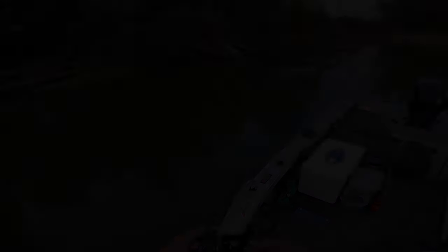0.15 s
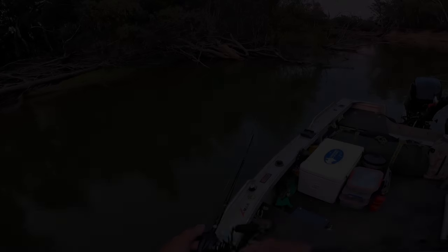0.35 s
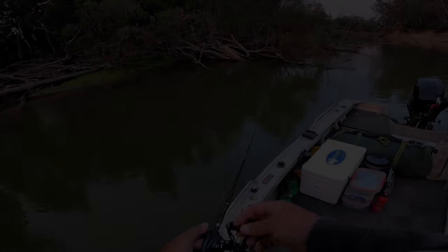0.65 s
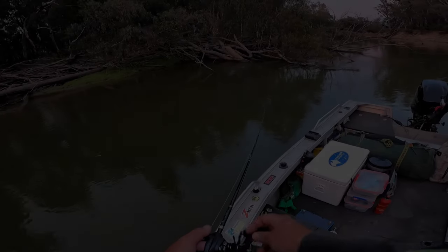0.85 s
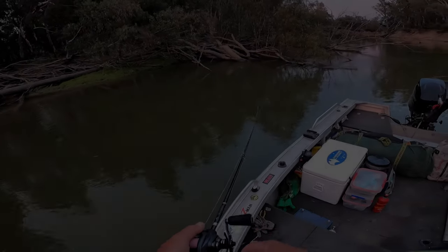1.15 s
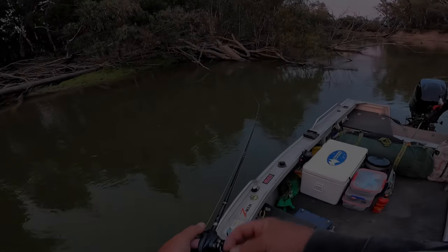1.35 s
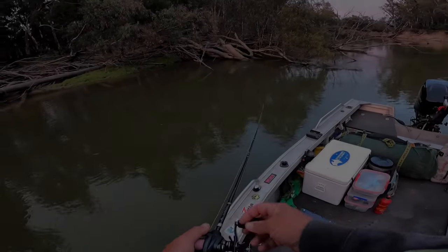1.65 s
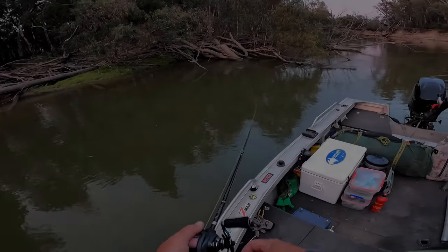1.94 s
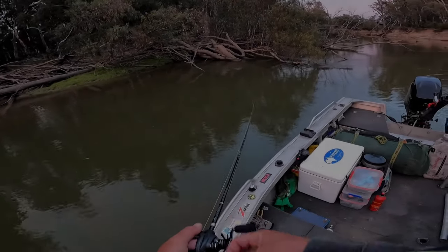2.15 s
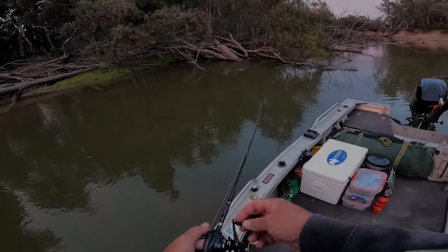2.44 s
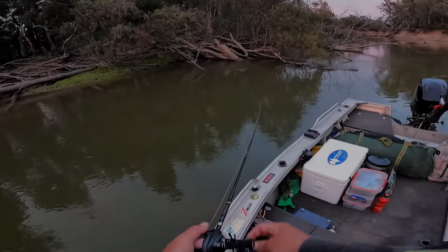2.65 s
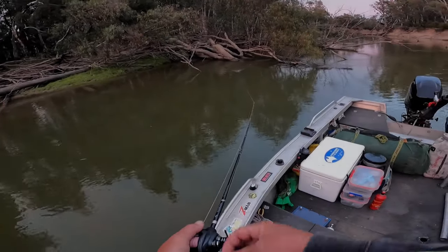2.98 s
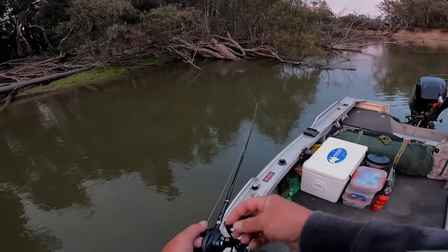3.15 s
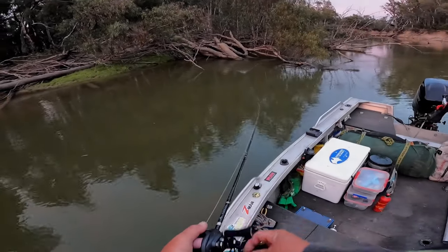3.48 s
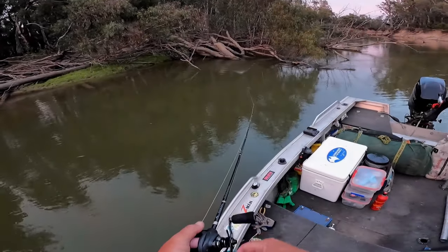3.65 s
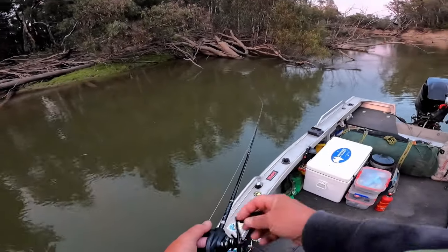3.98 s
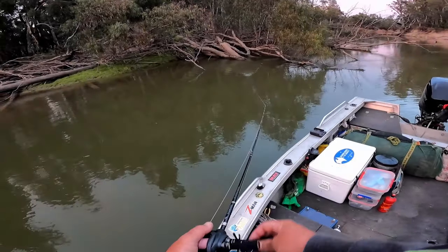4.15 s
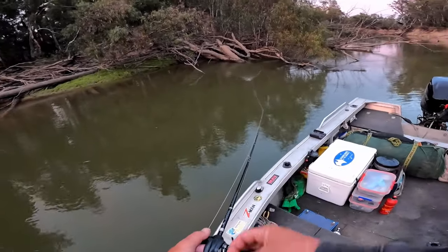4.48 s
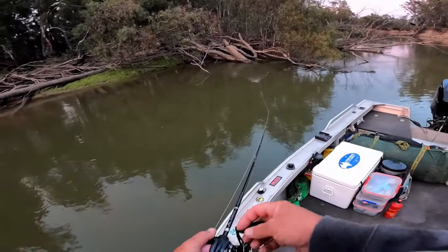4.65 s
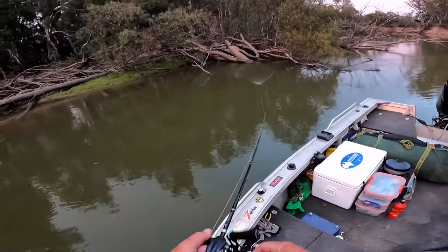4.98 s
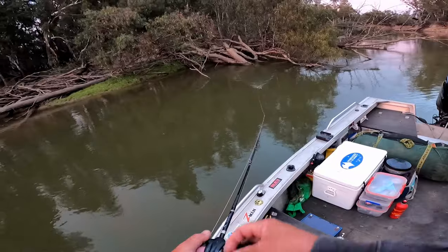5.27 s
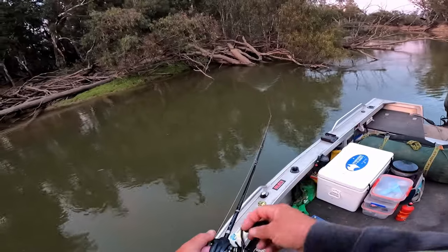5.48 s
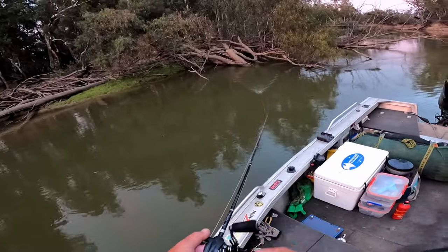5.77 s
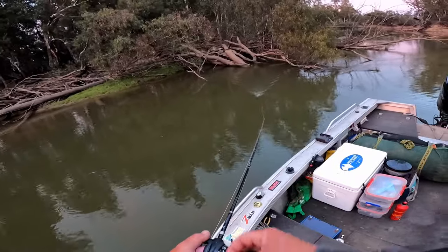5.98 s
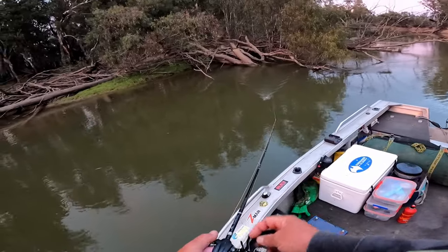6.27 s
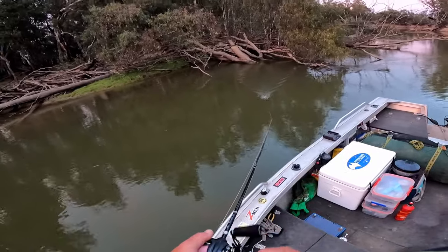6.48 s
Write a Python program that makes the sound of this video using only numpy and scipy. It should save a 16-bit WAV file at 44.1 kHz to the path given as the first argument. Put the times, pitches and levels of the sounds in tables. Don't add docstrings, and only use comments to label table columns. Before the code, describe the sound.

A wide, airy river murmur and a hazy distant flock run throughout, strongest at the start. From 0 s a harsh cockatoo screech is already under way, with nasal parrot cries; overlapping screeches swell around 0.5-1.05 s and another at 1.3-1.8 s, echoing from wooded banks. Close and dry, a fishing reel makes tiny bright ticks in uneven clusters, while water laps and softly bumps the hull. Faint dove coos and thin whistles fill gaps. A rougher, quieter screech spans 2.1-2.9 s. From 2.4 s a small bird repeats a crisp rising chip about every 0.14 s, pausing briefly near 4.6-5 s and ending around 5.5 s. At 3.6 s a sharp click coincides with short squawks; parrots cry again. At 4.4 s the hull knocks hollowly. Softer screeches and nasal calls continue, a strong reel tick lands at 5.2 s, and two-step falling notes sound right at 5.95-6.2 s before a last raspy screech.

```python
import sys
import numpy as np
from scipy import signal
from scipy.fft import rfft, irfft, next_fast_len
from scipy.io import wavfile
from scipy.ndimage import uniform_filter1d

SR = 44100
rng = np.random.default_rng(int(sys.argv[2]) if len(sys.argv) > 2 else 0)


def convert_level_to_amplitude(level_db):
    exponent = np.asarray(level_db, float) / 20
    return 10 ** exponent


def bounce(signal):
    frames = np.transpose(np.atleast_2d(signal))
    limited = np.clip(frames, -1, 1)
    pcm = np.round(limited * 32767).astype(np.int16)
    wavfile.write(sys.argv[1], SR, pcm)


N = 291942

# (f/Hz, lead/radians)
PORTS = [(300, 0.5), (900, -0.72), (2500, -1.49), (3800, -1.45), (6000, -0.17), (12000, -1)]
NOSE_LOW_HZ = 950


def evened(x):
    return x / np.sqrt(np.mean(x ** 2) + 1e-20)


def read(points, at):
    f, value = np.transpose(points)
    return np.interp(np.log(at + 1), np.log(f + 1), value)


def unroll(rows):
    s, *columns = np.transpose(rows)
    t = np.arange(s[0], s[-1], 1 / SR)
    return t, [np.interp(t, s, c) for c in columns]


def wander(count, hz):
    smoother = np.poly([np.exp(-2 * np.pi * hz / SR)] * 2)
    return evened(signal.lfilter([1], smoother, rng.standard_normal(count)))


def add(mix, s, sound, lean_db=0, side=0.54):
    length = next_fast_len(len(sound) + 64, True) // 2 * 2 + 2
    padded = np.pad(sound, (0, length - len(sound)))
    lead = side * read(PORTS, np.fft.rfftfreq(length, 1 / SR))
    left = irfft(rfft(padded) * np.exp(1j * lead))
    both = np.array([left * convert_level_to_amplitude(lean_db / 2), padded * convert_level_to_amplitude(-lean_db / 2)])
    part = mix[:, max(round(s * SR), 0):][:, :length]
    part += both[:, :part.shape[1]]


def resonate(x, hz, width):
    turn = np.exp(2j * np.pi * np.cumsum(hz * np.ones(len(x))) / SR)
    r = np.exp(-np.pi * width / SR)
    return 2 * (turn * signal.lfilter([1 - r], [1, -r], x / turn)).real


def resonate_twice(x, hz, width, width_again):
    return resonate(resonate(x, hz, width), hz, width_again)


def air():
    # (f/Hz, level per Hz/dB)
    colour = [(20, -14.5), (60, -20), (100, -75), (160, -7.5), (350, -17), (570, -6.5), (800, -11),
              (1200, 4), (3100, 1), (5000, -8), (7500, -21), (10000, -36), (13000, -43), (15500, -66)]
    # (f/Hz, likeness 0-1)
    likeness = [(60, 0.7), (150, 0.12), (400, 0.67), (1500, 1), (3000, 0.98), (7000, 0.77), (10000, 1),
                (13000, .4)]
    # (t/s, level/dB)
    chorus = [(0, 10.5), (.45, 5.5), (1.2, 2.5), (1.6, 4), (2.0, -3.5), (2.4, 2.5), (2.7, 3), (3.0, 0),
              (3.3, -3), (3.55, -1.5), (4.0, 4.5), (4.4, 0.5), (5.1, 0.5), (5.4, 3), (5.75, -4.5),
              (6.05, -1), (6.35, -5), (6.62, -4)]
    frames, hz = N // 256 + 5, np.fft.rfftfreq(1024, 1 / SR)
    a, b, c, d, patches = rng.standard_normal((frames, 513, 5)).T
    patches = evened(uniform_filter1d(uniform_filter1d(patches, 4, 0), 20, 1))
    same = np.clip(read(likeness, hz), -1, 1)[:, None]
    left = a + 1j * b
    right = same * left + np.sqrt(1 - same ** 2) * (c + 1j * d)
    z = np.array([left * np.exp(.8j * read(PORTS, hz))[:, None], right])
    flock_db = np.interp(np.arange(frames) * 256 / SR, *np.transpose(chorus))
    flock_share = np.clip((hz - 300) / 300, 0, 1)
    patchy_db = 2.6 + 1.4 * (hz < NOSE_LOW_HZ)
    z *= convert_level_to_amplitude(read(colour, hz)[:, None] + patchy_db[:, None] * patches + np.outer(flock_share, flock_db))
    return convert_level_to_amplitude(-41.5) * evened(signal.istft(z, nperseg=1024, noverlap=768)[1][:, :N])


def effort(start, top, end, hz, db, bright_db, end_db):
    mouth_hz, swell_db, slack_hz = 3277, -4.5, hz * .93
    dull_db = bright_db - 3.5
    onset = start + min(.09, .5 * (top - start))
    peak_and_end = [(top, db, hz, mouth_hz, bright_db), (end, db + end_db, hz * .97, mouth_hz, dull_db)]
    if start < 0:
        return [(0, db + swell_db, hz * 1.12, mouth_hz, bright_db), *peak_and_end]
    return [(start, db + swell_db - 10, slack_hz, mouth_hz, dull_db),
            (onset, db + swell_db, slack_hz, mouth_hz, dull_db), *peak_and_end]


def screech(rows, share, rough, growl_hz=170, growl_db=2.5):
    # (f/Hz, width/Hz, level/dB)
    beak_rings = [(977, 750, 5), (2863, 610, 18.5), (3710, 1090, 13), (4434, 1140, 7.5), (6970, 300, 3)]
    t, (effort_db, throat_hz, mouth_hz, bright_db) = unroll(rows)
    count, since = len(t), t - t[0]
    rough = np.clip(rough, 0, 1)
    unsteady = 1 + .024 * wander(count, 118.3) + .015 * wander(count, 12.07)
    turns = np.cumsum(share * throat_hz * unsteady) / SR
    folds = sum(np.cos(2 * np.pi * k * turns) for k in range(1, 13))
    puffs = (0.37 + np.exp(-(turns % 1) / 1.2)) * rng.standard_normal(count)
    drive = (1 - rough) * evened(folds) + rough * evened(puffs)
    drive = drive * convert_level_to_amplitude(2.1 * np.tanh(wander(count, 27)))
    beats = np.cumsum(growl_hz * (1 + .5 * since + .12 * wander(count, 30))) / SR
    depth_db = growl_db * (.45 + np.exp(-(since / .2) ** 2))
    drive = drive * convert_level_to_amplitude(depth_db * np.cos(2 * np.pi * beats))
    throat = resonate_twice(drive, throat_hz, 560, 560)
    for near, db in ((1, -5), (.9, -9), (1.09, -13)):
        level = convert_level_to_amplitude(db + 3 * wander(count, 8))
        ridge_hz = near * throat_hz * (1 + .025 * wander(count, 14))
        throat = throat + level * resonate(drive, ridge_hz, 90)
    mouth = resonate_twice(drive, mouth_hz, 670, 690)
    beak = sum(convert_level_to_amplitude(db) * resonate_twice(drive, f, w * 0.83, w * 0.83) for f, w, db in beak_rings)
    out = convert_level_to_amplitude(0.5) * evened(throat) + convert_level_to_amplitude(bright_db) * (evened(beak) + convert_level_to_amplitude(-3.5) * evened(mouth))
    return t[0], convert_level_to_amplitude(effort_db) * out * np.clip(np.minimum(since, t[-1] - t) / 0.0033, 0, 1)


def cockatoos():
    # (start t/s, loudest t/s, end t/s, throat f/Hz, roughness 0-1)
    broken = [
        (-.1, .158, .305, 1860, .54),
        (.55, .88, 1.058, 2200, .5),
        (1.27, 1.56, 1.782, 1960, .48),
        (.5, .75, 1.05, 1960, .54),
        (4.4, 4.78, 5.02, 2460, .6),
        (5.13, 5.36, 5.7, 2250, .6),
    ]
    faded = [
        (2.1, 2.45, 2.86, 2200, .77),
        (3.583, 3.6, 3.78, 1800, .68),
        (3.74, 4.0, 4.33, 2180, .42),
        (5.8, 5.89, 6.02, 2500, .82),
        (6.07, 6.38, 6.56, 1900, .9),
    ]
    # (effort level/dB, brightness level/dB, left minus right level/dB, side 0-2)
    efforts = [(-29.5, -4, -3, .94), (-28.5, -3, -1, 0.68), (-33.5, -4.5, -0.5, 0.78), (-31, -2, 0.5, 0.8),
               (-39.5, -10.5, -3, 0.57), (-43.5, 0, -4, 1.1), (-48, -6.5, 12.5, 1.4), (-40.5, -43, -1, .6),
               (-38, -6, -3, 0.63), (-46, 3.5, -3, 0.62), (-42, -2, 0.5, 0.56)]
    # (rasp pitch as a share of throat f, throb f/Hz, throb depth level/dB)
    growls = [(.5, 125, 3), (.5, 125, 2), (.5, 108, 6), (.5, 180, 3), (.5, 150, 2), (.86, 150, 2),
              (.36, 150, 2), (.28, 130, 3), (.28, 150, 2), (.89, 150, 3), (.24, 150, 2)]
    out = np.zeros((2, N))
    ends_db = [0] * len(broken) + [-7.5] * len(faded)
    for row, end_db, loudness, growl in zip(broken + faded, ends_db, efforts, growls):
        *moments, rough = row
        db, bright_db, lean_db, side = loudness
        share, *throb = growl
        curve = effort(*moments, db, bright_db, end_db)
        add(out, *screech(curve, share, rough, *throb), lean_db, side)
    return out


def glide(start, length, first_hz, last_hz, db, first_db, last_db, arch=0):
    middle_hz = .5 * (first_hz + last_hz) * (1 + arch)
    return [(start, first_hz, db + first_db), (start + .5 * length, middle_hz, db),
            (start + length, last_hz, db + last_db)]


def partials(rows, fall_db, odd_db, nose_hz, lift_db, sheen_hz, sheen_db):
    k = np.arange(2, 15)
    hz = k * np.mean([row[1] for row in rows])
    nose = lift_db * np.exp(-((hz - nose_hz) / 400) ** 2)
    sheen = sheen_db * np.exp(-((hz - sheen_hz) / 840) ** 2)
    fall = fall_db * (np.minimum(k, 7) - 2) - 4 * np.maximum(k - 6, 0)
    odd = odd_db * np.where(k < 7, k % 2, 1)
    return [-22, *(-3 + fall + odd + nose + sheen - 14 * (hz < NOSE_LOW_HZ))]


def voice(rows, levels_db):
    t, (hz, effort_db) = unroll(rows)
    turns = np.cumsum(hz * (1 + .004 * wander(len(t), 78))) / SR
    out = 0
    for k, db in enumerate(levels_db):
        flutter_db = 1.8 * (1 + (k > 4)) * wander(len(t), 22)
        out = out + convert_level_to_amplitude(db + flutter_db) * np.cos(2 * np.pi * ((k + 1) * turns + rng.random()))
    return t[0], np.sqrt(2) * convert_level_to_amplitude(effort_db) * out * signal.windows.tukey(len(t), .1)


def parrots():
    # (t/s, f/Hz, level/dB)
    long_cries = [
        [(0.0, 581, -32), (0.056, 605, -41), (0.43, 579.5, -43), (0.46, 575, -46), (0.56, 560.4, -40)],
        [(3.42, 642, -70), (3.47, 656, -47.5), (3.52, 676, -49), (3.565, 762, -48)],
        [(3.68, 574, -36.5), (3.74, 589.6, -36), (3.785, 602, -59)],
        [(4.87, 652.6, -47), (4.915, 647.5, -38.5), (4.96, 599, -44), (5.03, 584, -85)],
        [(5.37, 589.5, -44.5), (5.42, 579, -53), (5.52, 576, -45.5), (5.58, 544, -50)],
        [(5.625, 642, -40.5), (5.655, 635, -48), (5.69, 657, -43.5), (5.73, 636.3, -45), (5.815, 639.6, -43),
         (5.86, 611.5, -45.5), (5.9, 583, -55), (5.95, 582, -42.5)],
        [(6.18, 358, -50), (6.25, 360.3, -51), (6.3, 377.5, -49.5), (6.34, 396.3, -50.5), (6.365, 420, -43),
         (6.43, 422, -50), (6.47, 394, -45)],
        [(3.75, 625, -52), (3.82, 627, -58), (3.9, 622, -44.5), (3.945, 626, -45), (3.97, 612, -46)],
        [(4.02, 607, -45), (4.1, 581, -39.5), (4.2, 578, -41.5), (4.265, 571, -43)],
        [(5.18, 551, -47.5), (5.25, 552, -44), (5.33, 526, -44)],
        [(5.16, 672, -48), (5.19, 673, -39.5), (5.22, 675, -48)],
        [(2.795, 566.4, -38), (2.825, 606, -45.5), (2.9, 599.7, -43.5), (2.97, 611.6, -43.5),
         (3.025, 583.5, -42.5)],
    ]
    # (start t/s, length t/s, first f/Hz, last f/Hz)
    swelling = [
        (.36, .2, 665, 612),
        (2.43, .27, 578, 570),
        (4.5, .36, 602, 600),
        (5.54, .075, 635, 658),
        (2.3, .14, 604, 615),
    ]
    steady = [
        (1.94, .24, 600, 622),
        (3.955, .085, 680, 656),
        (1.068, .075, 420, 396),
    ]
    short_db = [-45.5, -50.5, -52, -52.5, -61, -51, -37.5, -45]
    # (fall per overtone level/dB, odd overtones level/dB, nose f/Hz, its lift level/dB, left minus right level/dB)
    noses = [(-3, -10, 2350, 5, 0), (-2.5, -9, 2750, 8, 15.5), (-5, 3, 2300, -6, -0.5),
             (-0.5, -2.5, 2370, 11.5, 1), (-5, 3, 1750, 7, -0.5), (-2.5, 0.5, 2600, 17, -0.5),
             (-1, -1, 1830, 14, 2.5), (-.8, 1, 3700, 0, -.5), (-2.5, -3, 2300, -6, -.5),
             (-2.5, -5, 2200, 3, 0), (-2.5, -6, 2700, 4, 0), (-6, 0, 1810, 13, -1.5),
             (-1, 0, 2560, 11, -1.5), (-8, -7, 2020, 27, 4), (-0.5, -1.5, 2630, 12.5, 7),
             (-3.5, 4, 2580, 20, 0.5), (-2, 0, 2400, 4, 36), (-7, -16, 1220, 0, 15),
             (-6.5, -26, 2700, 14.5, 3), (0, 1, 1950, 17, 4.5)]
    sheens = {5.37: (5200, 32), 3.75: (6100, 15), 4.02: (3600, 3), 5.625: (3500, 5), 6.18: (3500, 13)}
    out = np.zeros((2, N))
    cries = long_cries + [glide(*row, db, -1, 5.7, arch=.018) for row, db in zip(swelling, short_db)]
    cries += [glide(*row, db, 0, -2) for row, db in zip(steady, short_db[len(swelling):])]
    for rows, (*nose, lean_db) in zip(cries, noses):
        sheen = sheens.get(rows[0][0], (3500, 0))
        add(out, *voice(rows, partials(rows, *nose, *sheen)), lean_db, side=0.71)
    return out


def banks(x):
    # (f/Hz, t/s)
    dying = [(300, 2.8), (2000, 0.71), (6000, 1.12), (12000, 0.19)]
    taps = np.zeros((2, SR))
    at = np.arange(900, SR - 20, 20) + rng.integers(0, 20, (2, (SR - 901) // 20))
    np.put_along_axis(taps, at, rng.choice([-1., 1.], at.shape), 1)
    taps[1] = 0.63 * taps[0] + 0.47 * taps[1]
    hz, t, z = signal.stft(taps, SR, nperseg=256)
    tail = signal.istft(z * convert_level_to_amplitude(-60 * t / read(dying, hz)[:, None]), SR, nperseg=256)[1]
    return signal.fftconvolve(x, tail / np.linalg.norm(tail[0]), axes=1)[:, :N]


def ring(db, hz, t60, noisy=0.45, spread=1.0):
    t = np.arange(0, 1.5 * t60 + .01, 1 / SR)
    blur = evened(resonate_twice(rng.standard_normal(len(t)), hz, spread * hz, spread * hz))
    tone = (1 - noisy) * np.sin(2 * np.pi * hz * t) + noisy * blur
    return convert_level_to_amplitude(db - 60 * t / t60) * tone * np.minimum(t * hz * 2, 1)


def hull():
    # (t/s, level/dB, f/Hz)
    laps = [(0.035, -74, 291), (0.398, -62, 188), (1.392, -63, 193), (1.787, -69, 221), (1.978, -60, 170),
            (2.142, -56.5, 216), (2.918, -64, 153), (3.21, -55, 178.2), (3.473, -60, 176),
            (4.062, -56, 171), (4.383, -48, 255), (4.87, -57, 160), (5.81, -61, 160.6), (6.497, -56, 170)]
    bumps = [(0.257, -70, 53.8), (0.55, -69, 32.3), (1.115, -64, 51.1), (2.254, -64, 29.6),
             (2.839, -61, 24.2), (3.127, -62, 37.4), (3.481, -71, 34.6), (3.732, -75, 24.2),
             (4.365, -60, 59.2), (4.583, -64, 50.3), (4.85, -75, 53.8), (5.457, -56, 34),
             (5.728, -70, 24.2), (6.327, -60, 27.2)]
    # (t/s, level/dB, f/Hz, time to die by 60 dB t/s)
    knocks = [
        (3.758, -36, 6200, .02),
        (4.372, -46, 560, .12),
        (4.385, -42, 300, .09),
        (4.402, -48, 172, .17),
        (5.0, -45, 6000, .013),
        (6.25, -48, 7100, .02),
    ]
    out = np.zeros((2, N))
    for rows, t60, lean_db in ((bumps, .25, -1.5), (laps, .12, -3)):
        for s, db, hz in rows:
            add(out, s, ring(db, hz, t60, noisy=0.16, spread=0.27), lean_db, side=0)
    for s, *blow in knocks:
        add(out, s, ring(*blow, noisy=.25, spread=.35), side=0)
    return out


def reel():
    # (t/s, low ring level/dB, low ring f/Hz, high ring level/dB)
    ticks = [(0.2344, -36, 7670, -62), (0.288, -49, 7510, -55), (1.3488, -56, 7180, -85),
             (1.3648, -55, 7470, -75), (1.3835, -38, 7170, -64), (1.4456, -51, 7200, -80),
             (1.487, -39, 7420, -73), (1.5045, -41, 7470, -71), (1.6914, -49, 7900, -70),
             (1.732, -36.5, 7400, -83), (1.854, -49, 7140, -70), (2.145, -58, 7250, -78),
             (2.1645, -59, 7300, -83), (2.1857, -43, 8150, -63), (2.364, -55, 7840, -80),
             (2.5027, -47, 7510, -65), (2.5464, -44, 7570, -59), (2.6768, -53, 7020, -75),
             (2.7706, -64, 7600, -70), (2.9493, -52, 7250, -68), (3.1502, -35, 6900, -62),
             (3.1647, -50, 7600, -62), (3.5177, -62, 7280, -65), (3.6607, -41, 7200, -50.5),
             (3.8786, -40, 7500, -64.5), (3.906, -45, 7750, -64), (4.1435, -52, 7030, -74),
             (4.159, -42, 7700, -64), (4.1834, -50, 7900, -68), (4.2476, -50, 7540, -57.5),
             (4.3257, -54, 7100, -64), (4.384, -44, 6940, -60), (4.4703, -44, 7140, -66),
             (4.5768, -41, 7200, -75), (4.7157, -50, 7050, -65), (4.884, -40, 7800, -68),
             (5.1967, -38, 6700, -69), (5.2018, -31, 7300, -59), (5.3138, -50, 7100, -68),
             (5.4142, -42, 7350, -61), (5.4435, -50, 6960, -68), (5.6456, -51, 7000, -65),
             (5.9459, -48, 7300, -66), (5.967, -42, 7560, -61), (6.051, -48, 7800, -75),
             (6.0975, -41, 7080, -58), (6.279, -44, 7590, -70), (6.37, -60, 7740, -66),
             (6.5103, -36.5, 7740, -67)]
    out = np.zeros((2, N))
    clicks = [(s, db + 7, high_db, hz) for s, db, hz, high_db in ticks]
    for k, (late, loud) in enumerate(rng.random((26, 2))):
        gear_db = -59 + 8 * loud
        clicks.append((1.9 + (k + late) / 6, gear_db + 16, gear_db - 17, 7160))
    for k, (s, low_db, high_db, hz) in enumerate(clicks):
        add(out, s, ring(low_db, hz, 0.0044, spread=0.14), lean_db=1.0, side=-0.45)
        add(out, s, ring(high_db + 10, 11440, 0.007, spread=.22), lean_db=4.0, side=-.5)
        second = ring(high_db + 14, 9960, 0.0045, noisy=0.96, spread=0.2)
        add(out, s + 0.00031, second, lean_db=6.3 * (-1) ** k, side=0)
    add(out, 3.5888, ring(-21, 2100, .006, noisy=.1), side=.3)
    return out


def whistle(rows):
    t, (hz, db) = unroll(rows)
    hz = hz * (1 + .004 * wander(len(t), 150))
    db = db + 1.5 * wander(len(t), 70)
    tone = np.sin(2 * np.pi * np.cumsum(hz) / SR)
    return t[0], np.sqrt(2) * convert_level_to_amplitude(db) * tone * signal.windows.tukey(len(t), .3)


def whistlers():
    # (start t/s, length t/s, first f/Hz, last f/Hz)
    middle = [(2.04, .022, 4780, 4740), (2.39, .06, 2550, 2250), (3.33, .07, 2470, 2720),
              (3.71, .07, 1770, 1820), (5.485, .03, 990, 990), (5.49, .045, 2450, 2180),
              (5.7, .2, 7150, 6700), (5.87, .06, 3160, 2800), (5.92, .04, 4760, 4710),
              (1.55, .23, 950, 1000), (6.18, .06, 1250, 1265), (6.18, .06, 1615, 1635),
              (.55, .17, 2800, 2880), (2.69, .06, 2350, 2250), (2.6, .2, 710, 800), (4.6, .12, 1290, 1310)]
    middle_peaks = [-50, -47, -44.5, -38.5, -48, -43, -55.5, -38.5, -44, -44.5, -47, -47, -39.5, -39.5,
                    -52.5, -44]
    high = [
        (1.94, .04, 5750, 5550),
        (2.35, .068, 6180, 6000),
        (2.425, .035, 6080, 5900),
        (2.572, .09, 6180, 6440),
        (2.708, .075, 5700, 5780),
        (2.94, .12, 5480, 5590),
        (4.085, .055, 6450, 6400),
        (2.108, .03, 6000, 6050),
    ]
    high_peaks = [-57, -43, -44, -42, -41, -39.5, -46, -58]
    out = np.zeros((2, N))
    for table, peaks, ends_db, arch in ((high, high_peaks, -12, .014), (middle, middle_peaks, -5, 0)):
        for row, db in zip(table, peaks):
            add(out, *whistle(glide(*row, db, ends_db, ends_db, arch)), lean_db=-3.0, side=0.6)
    return out


def dove():
    # (t/s, level/dB, f/Hz)
    coos = [(0.617, -50, 437), (1.029, -42, 399), (1.523, -54.5, 579), (1.971, -51.5, 516),
            (2.352, -54.5, 535), (2.677, -50, 441), (2.99, -53, 411), (3.582, -57, 469), (4.016, -71, 585),
            (4.171, -52, 486), (5.197, -52, 447), (5.869, -52, 420), (6.487, -57.5, 455.4)]
    out = np.zeros((2, N))
    for s, db, hz in coos:
        add(out, *whistle([(s, hz * 1.01, db - 6), (s + .02, hz, db - 4), (s + .045, hz * .985, db - 8)]))
    return out


def chip(s, db, hz, fresh):
    shape = [(-.02, .88, -20), (-.005, .9, -14), (0, .94, -4), (.007, .98, -2),
             (.015, 1.005, -2 - 4 * fresh), (.022 + .012 * fresh, 1.01 + .04 * fresh, -7 - 7 * fresh)]
    return whistle([(s + dt, hz * share, db + change) for dt, share, change in shape])


def chipper():
    # (t/s, f/Hz, level/dB)
    first = [(2.41, 3405, -47), (2.425, 3400, -37), (2.432, 3530, -42), (2.443, 3620, -32.5),
             (2.456, 3600, -41)]
    # (t/s, level/dB)
    chips = [(2.5534, -34.5), (2.681, -36), (2.808, -35), (2.9366, -35), (3.0741, -36.5), (3.208, -37),
             (3.3534, -33.5), (3.5066, -34.5), (3.662, -38.5), (3.813, -39.5), (3.967, -42), (4.113, -39),
             (4.2683, -39), (4.419, -39.5), (4.576, -39.5), (5.03, -44), (5.194, -40.5), (5.352, -39),
             (5.504, -42.5)]
    out = np.zeros((2, N))
    add(out, *whistle(first), 3.5, side=0.41)
    for s, db in chips:
        fresh = np.exp(-((s - chips[0][0]) / .86) ** 2)
        add(out, *chip(s, db, 3207 + 116.4 * fresh, fresh), 3.5, side=0.35)
    return out


def squawkers():
    # (start t/s, loudest t/s, end t/s, throat f/Hz)
    squawks = [
        (3.588, 3.6, 3.77, 1350),
        (3.93, 4.0, 4.035, 1500),
        (4.6, 4.8, 4.96, 3400),
        (5.33, 5.5, 5.63, 5250),
    ]
    efforts = [-37.5, -35.5, -39, -49]
    out = np.zeros((2, N))
    for row, db in zip(squawks, efforts):
        curve = effort(*row, db, bright_db=-13, end_db=-16.0)
        add(out, *screech(curve, share=0.17, rough=0.99), side=0.68)
    return out


def falling_notes():
    # (t/s, level/dB)
    falls = [
        (5.952, -41),
        (6.132, -45),
        (6.19, -45),
    ]
    shape = [(-.022, 4660, -14), (-.012, 4640, -7), (-.005, 4600, -30), (0, 4230, -8), (.009, 4130, -2),
             (.012, 3810, -4), (.024, 3780, 0), (.034, 3700, -6), (.048, 3620, -14)]
    out = np.zeros((2, N))
    for s, db in falls:
        add(out, *whistle([(s + dt, hz, db + change) for dt, hz, change in shape]), lean_db=-19, side=1.0)
    return out


def scene():
    # (f/Hz, level/dB)
    distance = [(60, -47), (110, -27), (170, -5), (6000, -1), (9000, -7), (12000, -24.5), (14000, -26),
                (16000, -50)]
    large = cockatoos() + parrots() + squawkers()
    small = whistlers() + dove() + chipper() + falling_notes()
    birds = large + small + banks(convert_level_to_amplitude(-7.0) * large + convert_level_to_amplitude(-9.5) * small)
    size = next_fast_len(N, True)
    dulling = convert_level_to_amplitude(read(distance, np.fft.rfftfreq(size, 1 / SR)))
    birds = irfft(rfft(birds, size) * dulling, size)[:, :N]
    return air() + birds + hull() + reel()


def top_cut(x):
    return signal.sosfilt(signal.butter(12, 15710, fs=SR, output="sos"), x)


def record(dry):
    return top_cut(dry)


dry = scene()
out = record(dry)
bounce(out)
```